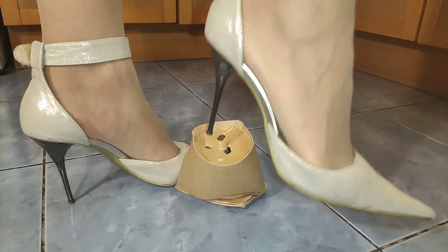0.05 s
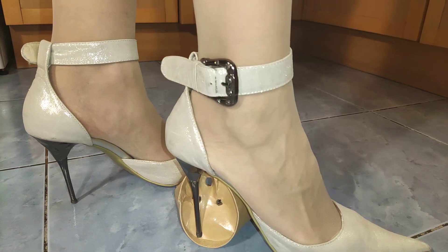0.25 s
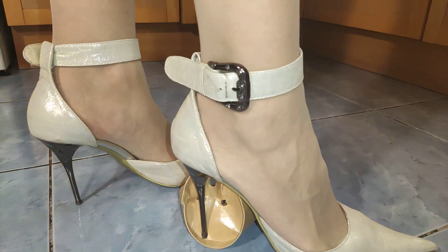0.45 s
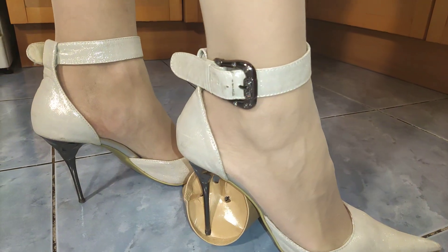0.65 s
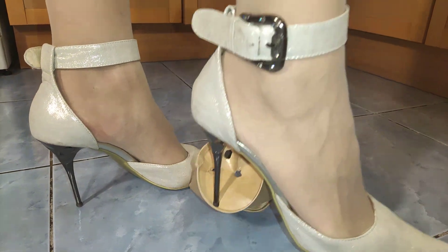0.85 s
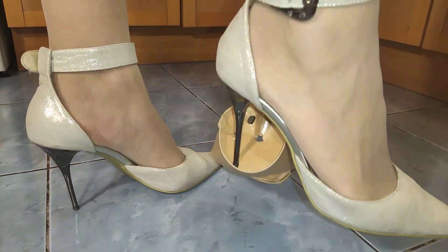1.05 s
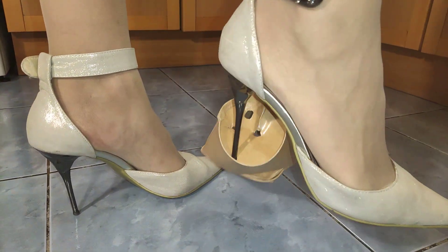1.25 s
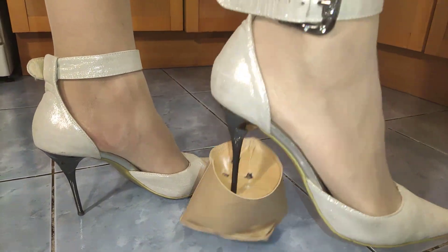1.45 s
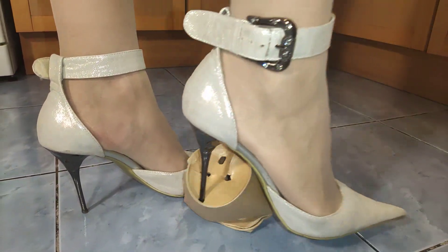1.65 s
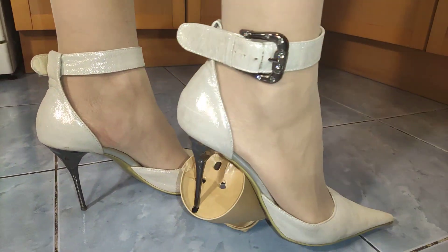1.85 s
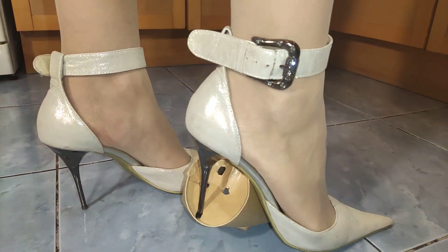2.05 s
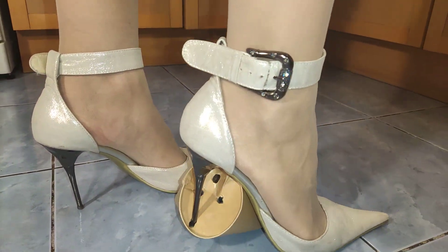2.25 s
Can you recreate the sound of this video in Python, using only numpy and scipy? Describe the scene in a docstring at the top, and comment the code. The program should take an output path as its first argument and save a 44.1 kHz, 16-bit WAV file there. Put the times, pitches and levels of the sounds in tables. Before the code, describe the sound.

Stiff card cup pops and crackles loudly under a stiletto heel, with faint rustles between two crunches

```python
"""A thin heel punches through a paper cup on a tiled kitchen floor, lifts it and treads on it again.
Hollow pops are short dying sines that also shake the cup's modes; fibre snaps are bursts of coloured
noise, heel tip and weight are single rings, and the crumpling card is swells of random clicks.
Two close ports hear it with first echoes and a small hard room's tail, over faint hum and hiss."""
import sys
import numpy as np
from scipy import signal
from scipy.fft import rfft, irfft, next_fast_len
from scipy.io import wavfile

SR = 44100
rng = np.random.default_rng(int(sys.argv[2]) if len(sys.argv) > 2 else 0)


def log_audio(samples):
    """Write samples as a 16-bit WAV file to the path given in sys.argv[1]."""
    # one column per channel
    frames = np.atleast_2d(samples).T
    # limit to full scale, then quantise
    limited = np.clip(frames, -1, 1)
    pcm = np.round(limited * 32767).astype(np.int16)
    wavfile.write(sys.argv[1], SR, pcm)


def amplitude_ratio(level_db):
    """Convert a level in decibels to the matching linear amplitude (field) ratio."""
    exponent = np.asarray(level_db, float) / 20
    return 10 ** exponent


N = 101429  # length in samples
ATTACK_S = 0.00019  # soft start of pops, snaps and the heel tip


def evened(x):
    """Scales to rms 1."""
    return x / np.sqrt(np.mean(x ** 2) + 1e-20)


def read(points, hz):
    """Reads a table on a log-frequency axis."""
    f, value = np.transpose(points)
    return np.interp(np.log(hz + 1), np.log(f + 1), value)


def add(mix, s, sound):
    """Mixes a sound in at time s, cut off at the end of the mix."""
    part = mix[round(s * SR):][:len(sound)]
    part += sound[:len(part)]


def paired(same, frames, size):
    """Two random spectra whose likeness in each band follows the table same."""
    a, b, c, d = rng.standard_normal((frames, size // 2 + 1, 4)).T
    same = np.clip(read(same, np.fft.rfftfreq(size, 1 / SR)), -1, 1)[:, None]
    left = a + 1j * b
    other = c + 1j * d
    return np.array([left, same * left + np.sqrt(1 - same ** 2) * other])


def resonate(x, hz, width):
    """One resonance of gain 1: shifts hz down to zero, smooths there and shifts back."""
    turn = np.exp(2j * np.pi * hz * np.arange(len(x)) / SR)
    r = np.exp(-np.pi * width / SR)
    return 2 * (turn * signal.lfilter([1 - r], [1, -r], x / turn)).real


def ring(hz, t60, rise_s):
    """A dying sine with a soft start, peak 1."""
    t = np.arange(6000) / SR
    decay = amplitude_ratio(-60 * t / max(t60, .002))
    x = (1 - np.exp(-t / rise_s)) * decay * np.sin(2 * np.pi * hz * t)
    return x / abs(x).max()


def thinned(x, hz):
    """A gentle one-pole low cut at hz."""
    r = np.exp(-2 * np.pi * hz / SR)
    return signal.lfilter([r, -r], [1, -r], x)


def clicks(per_s, spread_db):
    """Random clicks of either sign, a few of them large."""
    size = amplitude_ratio(spread_db * np.minimum(rng.exponential(1, N), 4)) * rng.choice([-1., 1.], N)
    return size * (rng.random(N) < per_s / SR)


def air():
    """Room hiss and rumble are shaped noise; hum lines waver because they are very narrow noise."""
    # colour of the air: (frequency [Hz], relative level per Hz [dB])
    air_colour = [(8.8, -19), (15, 1.5), (71, -19), (107, -4), (135, -23), (210, -16), (462, -22.5),
                  (584, -22), (638, -29), (697, -21.5), (1220, -29), (3500, -30.5), (8800, -42.5),
                  (14700, -40), (16500, -59)]
    # stereo width of the air: (frequency [Hz], left-right likeness [-1 to 1])
    air_same = [(60, 0.46), (130, 0.58), (290, 0.48), (640, 0.11), (1410, 0.51), (3100, 0.07),
                (6820, -0.42), (15000, 0.077)]
    # hum lines, the same in both ports: (frequency [Hz], rms level [dB])
    hum_lines = [(49.4, -63), (100.3, -66.5), (199.2, -69), (586.8, -78.5)]
    air_db, hum_width_hz = -56.5, 5  # rms of hiss and rumble; width of each of the two resonances
    hz = np.fft.rfftfreq(4096, 1 / SR)
    z = paired(air_same, N // 1024 + 5, 4096) * amplitude_ratio(read(air_colour, hz))[:, None]
    hiss = amplitude_ratio(air_db) * evened(signal.istft(z, nperseg=4096, noverlap=3072)[1][:, :N])
    hum = np.zeros(N)
    for f, db in hum_lines:
        once = resonate(rng.standard_normal(N), f, hum_width_hz)
        hum += amplitude_ratio(db) * evened(resonate(once, f, hum_width_hz))
    return hiss + hum


def cup(x):
    """The hollow cup rings with parallel modes of alternating sign; the upper ones vary over time."""
    # modes: (frequency [Hz], width [Hz], gain [dB])
    cup_modes = [(410, 270, -10), (609, 70, 1), (721, 63, -1), (816, 58, 3), (950, 205, -1), (1107, 90, 2),
                 (1274, 86.5, 0), (1581, 193, -6.5), (2160, 533, -14.5), (3000, 301, -14)]
    # extra gain of the upper modes: (time [s], gain [dB])
    upper_gain = [(1.3, -0.5), (1.5, -12.5), (1.59, -4), (1.68, -2.5), (1.76, 0)]
    upper_from_hz = 900
    upper_db = np.interp(np.arange(N) / SR, *np.transpose(upper_gain))
    out = np.zeros(N)
    for k, (hz, width, db) in enumerate(cup_modes):
        gain = amplitude_ratio(db + (hz > upper_from_hz) * upper_db)
        out += (-1) ** k * gain * resonate(x, hz, width)
    return out


def pops():
    """The wall buckles: each pop is a few cycles of a dying sine that also shake the cup."""
    # wall buckles: (time [s], peak ahead of the low cut [dB], pitch [Hz], t60 [s], at least 2 ms)
    buckles = [(.064, -43.5, 1220, 0.0093), (.2015, -15.5, 646, 0.012), (.2055, -21.5, 732, 0.018),
               (.2225, -18.5, 572.7, 0.019), (.2346, -17.5, 900, 0.0064), (.2495, -13, 830, 0.009),
               (.2715, -24, 800, 0.0099), (.2793, -14.5, 710, 0.0077), (0.2835, -1, 860, 0.0067),
               (.2866, -9.5, 610, 0.029), (0.2886, -8.5, 1140, 0.018), (.2908, -7, 763, 0.016),
               (.2941, -1.5, 1000, 0.0069), (.2985, -15, 799, 0.018), (.309, -18, 920, 0.014),
               (.404, -32, 820, 0.013), (.462, -31.5, 1030, 0.018), (.606, -40.5, 776, 0.035),
               (.6065, -44, 1370, 0.016), (.723, -39.5, 958, 0.027), (.7875, -35, 760, 0.037),
               (.902, -31, 950, 0.0065), (.918, -38.5, 708, 0.022), (1.5803, -11.5, 685, 0.01),
               (1.5827, -10, 784, 0.013), (1.5865, -11.5, 970, 0.012), (1.6135, -16.5, 690, 0.0086),
               (1.621, -23.5, 612, 0.072), (1.651, -34, 750, 0.011), (1.7315, -23.5, 700, 0.014),
               (1.773, -21.5, 990, 0.016), (1.839, -33.5, 890, 0.0084), (2.0775, -29.5, 900, 0.0028),
               (2.1515, -29, 1010, 0.0057)]
    low_cut_hz, cup_db = 200, -20
    direct = np.zeros(N)
    for s, db, hz, t60 in buckles:
        add(direct, s, -amplitude_ratio(db) * ring(hz, t60, ATTACK_S))
    direct = thinned(thinned(direct, low_cut_hz), low_cut_hz)
    return direct + amplitude_ratio(cup_db) * cup(direct)


def snaps():
    """Fibre snaps: dying cracks of noise in one band, over a trace of bright wide noise."""
    # fibre snaps: (time [s], level of the band at its start [dB], centre [Hz], t60 [s])
    fibres = [(0.065, -40.5, 5740, 0.0065), (0.2004, -20.5, 4230, 0.01), (0.2353, -17, 2400, .006),
              (0.2486, -14, 5750, 0.0034), (.268, -22, 4840, 0.052), (0.2864, -15, 5880, 0.012),
              (0.447, -37, 7130, 0.0047), (0.547, -44.5, 9500, 0.0029), (0.7163, -32, 6200, 0.0037),
              (0.899, -44, 11100, 0.0069), (1.5798, -23, 3000, 0.015), (1.583, -21.5, 4400, 0.0054),
              (1.6274, -29.5, 4560, 0.0097), (1.723, -41, 6400, 0.03), (1.766, -44, 8700, 0.023),
              (1.772, -34.5, 2630, 0.02), (1.82, -41, 9800, 0.0059), (1.884, -39.5, 7870, 0.0023),
              (2.078, -50.5, 3000, 0.0044)]
    relative_width, wide_db = 0.4, -21.5  # band width over centre; gain of the wide noise
    out, t = np.zeros(N), np.arange(4000) / SR
    for s, db, hz, t60 in fibres:
        noise = rng.standard_normal(4001)
        band = evened(resonate(noise[1:], hz, relative_width * hz))
        crack = band + amplitude_ratio(wide_db) * np.diff(noise)
        attack = np.minimum(t / ATTACK_S, 1)
        add(out, s, amplitude_ratio(db - 60 * t / t60) * attack * crack)
    return out


def pierce():
    """The heel tip piercing the card: high dying sines."""
    # piercings: (time [s], peak [dB], pitch [Hz], t60 [s])
    piercings = [(0.201, -8, 2780, 0.0086), (0.217, -32.5, 2865, .03)]
    out = np.zeros(N)
    for s, db, hz, t60 in piercings:
        add(out, s, amplitude_ratio(db) * ring(hz, t60, ATTACK_S))
    return out


def thumps():
    """Weight landing on the floor: low sines that die by 60 dB in a fixed number of cycles."""
    # landings: (time [s], peak [dB], pitch [Hz])
    landings = [(0.202, -35, 93), (0.234, -34.5, 148), (0.289, -35, 62), (0.293, -17.5, 234.6),
                (0.392, -37, 106), (0.917, -45, 150), (1.5804, -21, 254), (1.731, -32.5, 156),
                (1.775, -41.5, 200), (2.077, -38, 410)]
    out = np.zeros(N)
    for s, db, hz in landings:
        add(out, s, amplitude_ratio(db) * ring(hz, 2.84 / hz, 0.0027))
    return out


def crumple():
    """Small creases click into the cup; finer ones rustle like paper. Returns the middle and the side."""
    # swells of card noise; a row with a negative fall is silent:
    # (peak time [s], rise over 20 dB [s], fall per 20 dB [s], hollow body [dB], papery treble [dB])
    swells = [(.205, 0.0011, 0.0981, -28, -35), (0.243, 0.015, 0.0855, -28.5, -41.5),
              (.272, 0.022, 0.0521, -26, -29), (.292, 0.014, 0.0288, -17.5, -26.5),
              (.33, 0.018, 0.0343, -29, -39), (0.4, 0.044, 0.1383, -40, -45),
              (0.457, 0.029, 0.21, -54, -61), (.70, 0.017, 0.32, -55.5, -65),
              (.735, 0.024, 0.2, -56.5, -58.5), (0.764, 0.016, 0.03, -67, -62),
              (.895, 0.032, 0.03, -49.5, -57), (.92, 0.026, 0.08, -51, -54),
              (1.574, 0.077, -0.3, -46, -65.5), (1.585, 0.0049, 0.0843, -27.5, -43),
              (1.629, 0.012, 0.08, -34.5, -45), (1.69, 0.036, 0.17, -42, -50.5),
              (1.785, 0.035, 0.03, -47, -43), (1.828, 0.06, 0.05, -47.5, -49.5),
              (1.93, 0.024, 0.12, -53.5, -69), (1.974, 0.014, .04, -47.5, -68),
              (2.096, 0.031, 0.2, -49.5, -57), (2.162, 0.013, 0.02, -43, -57.5),
              (2.22, 0.18, 0.3, -52.5, -70), (2.299, 0.052, -4, -43.5, -54.5)]
    # colour of the papery rustle: (frequency [Hz], relative level per Hz [dB])
    paper_colour = [(1100, -19), (1700, 0.5), (3000, -0.5), (5500, -3.5), (8500, -13), (12000, -15),
                    (16000, -16)]
    body_per_s, body_spread_db = 1400, 3
    paper_per_s, paper_spread_db = 3000, 2.5
    side_db = -1.5  # creases all round the cup reach the two ports unalike
    t, hz = np.arange(N) / SR, np.fft.rfftfreq(N, 1 / SR)
    body = evened(cup(clicks(body_per_s, body_spread_db)))

    def rustle():
        """Fine clicks, coloured as paper."""
        fine = clicks(paper_per_s, paper_spread_db)
        return evened(irfft(rfft(fine) * amplitude_ratio(read(paper_colour, hz)), N))

    paper, side = rustle(), rustle()
    power = np.zeros((2, N))
    for s, rise, fall, body_db, paper_db in swells:
        a, b = np.searchsorted(t, [s - 2 * rise, s + 4 * fall])
        u = t[a:b]
        swell_db = -20 * np.where(u < s, ((s - u) / rise) ** 2, (u - s) / fall)
        power[:, a:b] += amplitude_ratio(swell_db + np.array([[body_db], [paper_db]])) ** 2
    body_level, paper_level = np.sqrt(power)
    return body_level * body + paper_level * paper, amplitude_ratio(side_db) * paper_level * side


def ports(x):
    """The two ports hear the cup and its first echoes with a time and level difference."""
    # left-right balance: (frequency [Hz], left minus right [dB])
    port_balance = [(60, -3), (240, 0), (950, 1.5), (3770, 1), (15000, -3.5)]
    # first echoes off tiles and cupboard: (left delay [s], left [dB], right delay [s], right [dB])
    first_echoes = [(.0013, -15, 0.0021, -13.5), (.0026, -14.5, 0.0046, -18), (.0041, -17, 0.0029, -14),
                    (.0068, -16, .0074, -15.5)]
    lag_s = 9e-5  # the left port hears later
    size = next_fast_len(N + SR // 10)
    hz = np.fft.rfftfreq(size, 1 / SR)
    half = amplitude_ratio(read(port_balance, hz) / 2) * np.exp(-1j * np.pi * hz * lag_s)

    def late(s, db):
        """One delayed copy, as a spectrum."""
        return amplitude_ratio(db) * np.exp(-2j * np.pi * hz * s)

    echo = 1 + sum(np.array([late(a, a_db), late(b, b_db)]) for a, a_db, b, b_db in first_echoes)
    return irfft(rfft(x, size) * np.array([half, 1 / half]) * echo, size)[:, :N]


def room(x):
    """A dense tail of random noise, each band dying at its own speed."""
    # decay: (frequency [Hz], t60 [s])
    room_decay = [(100, 0.59), (400, 0.33), (1000, 0.37), (3000, 0.45), (8000, 0.26), (15000, 0.119)]
    # colour of the tail: (frequency [Hz], relative level [dB])
    room_colour = [(100, -22), (700, -23), (3000, -24.5), (12000, -23.5)]
    # stereo width of the tail: (frequency [Hz], left-right likeness [-1 to 1])
    room_same = [(100, 1), (700, 0.47), (2000, 0.12), (12000, 0.074)]
    hz, t = np.fft.rfftfreq(512, 1 / SR), np.arange(300) * 128 / SR
    z = paired(room_same, 300, 512) * amplitude_ratio(-60 * t / read(room_decay, hz)[:, None])
    energy = (abs(z[0]) ** 2).sum(1)
    z = z / np.sqrt(energy)[:, None] * amplitude_ratio(read(room_colour, hz))[:, None]
    tail = signal.istft(z, nperseg=512, noverlap=384)[1] / 18
    tail = np.pad(tail, ((0, 0), (300, 0)))  # the tail starts 300 samples late
    return signal.fftconvolve(x[None], tail, axes=1)[:, :N]


def scene():
    """Cup, room and air; the side part reaches the two ports with opposite sign."""
    snap_side_db = -3
    middle, side = crumple()
    card = pops() + snaps() + pierce() + thumps() + middle
    side = side + amplitude_ratio(snap_side_db) * snaps()  # a second, independent set of snap noise
    return ports(card) + ports(side) * [[1], [-1]] + room(card + side) + air()


def low_pass(x):
    """Removes everything above the highest recorded frequency."""
    return signal.sosfilt(signal.butter(12, 16970, fs=SR, output="sos"), x)


def record(dry):
    """Cuts the mix steeply above 16.3 kHz and returns the finished sound."""
    edge = signal.firwin(511, 16300, window=("kaiser", 9), fs=SR)[None]
    mix = signal.oaconvolve(dry, edge, "same")
    return low_pass(mix)


dry = scene()
out = record(dry)
log_audio(out)
```